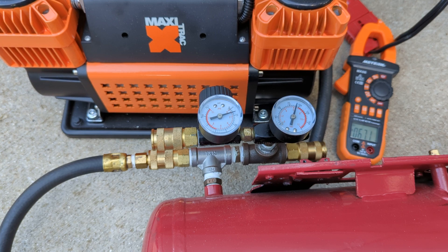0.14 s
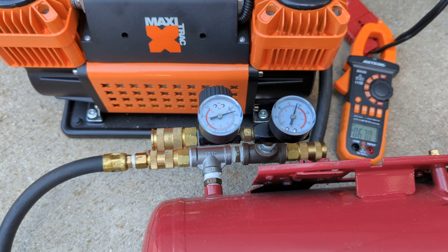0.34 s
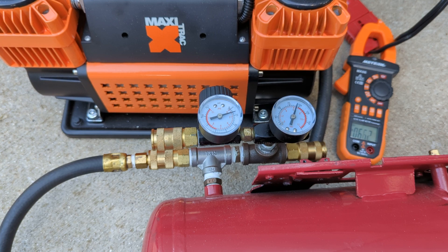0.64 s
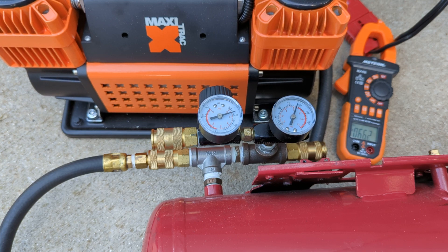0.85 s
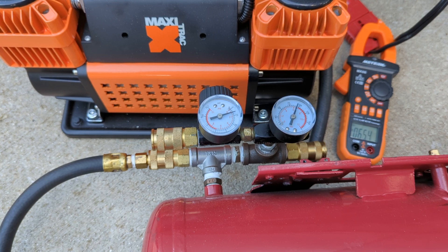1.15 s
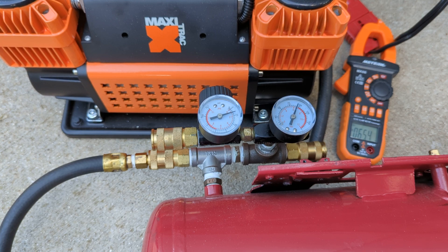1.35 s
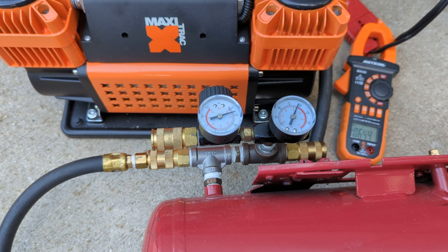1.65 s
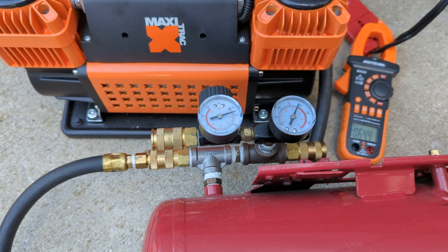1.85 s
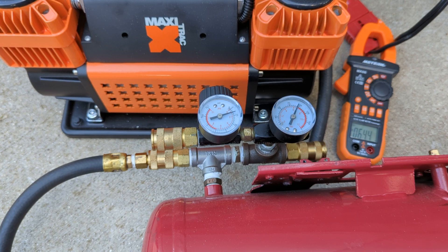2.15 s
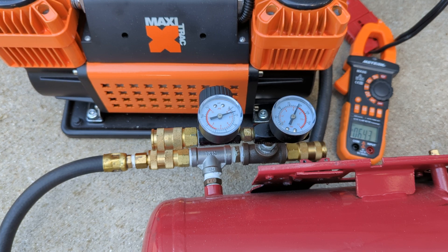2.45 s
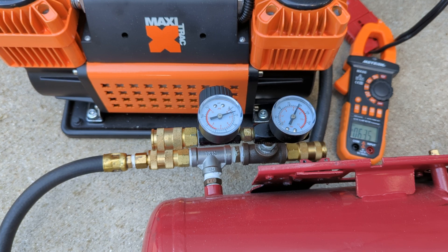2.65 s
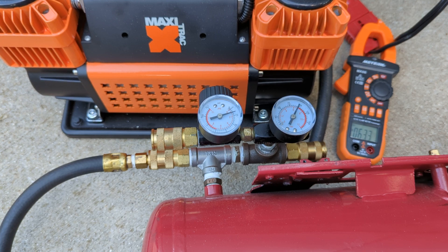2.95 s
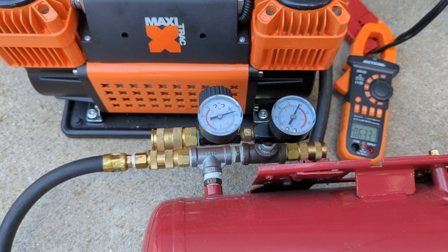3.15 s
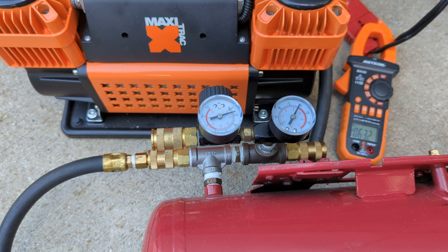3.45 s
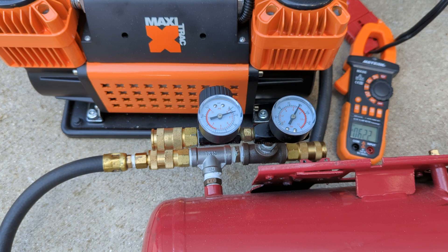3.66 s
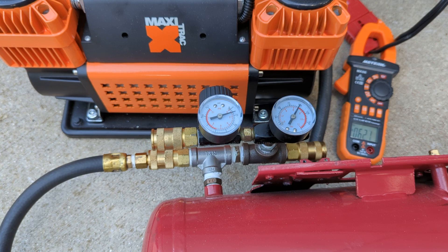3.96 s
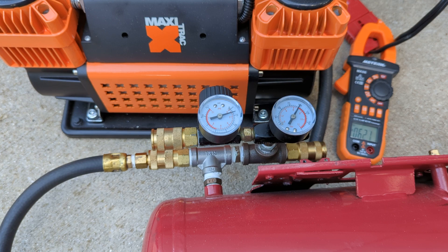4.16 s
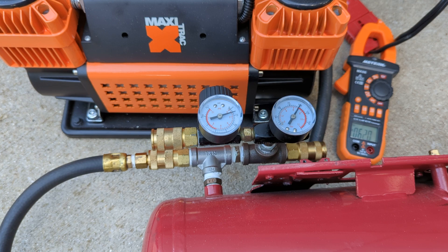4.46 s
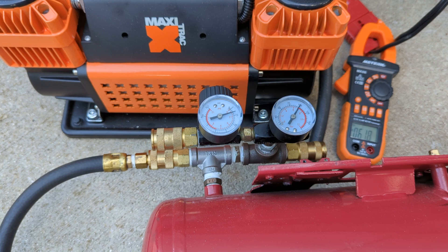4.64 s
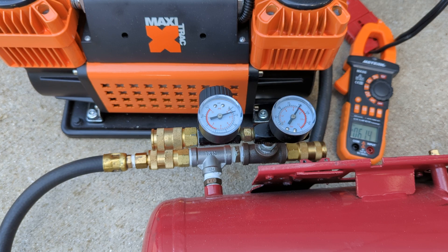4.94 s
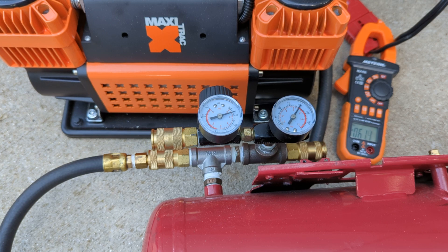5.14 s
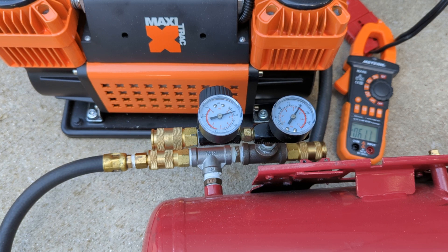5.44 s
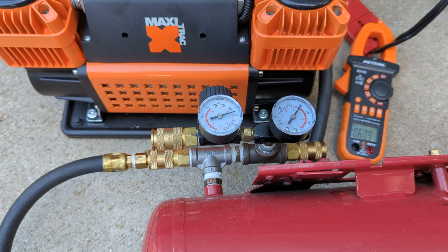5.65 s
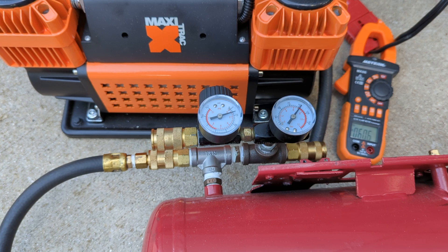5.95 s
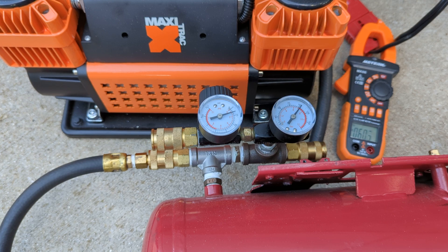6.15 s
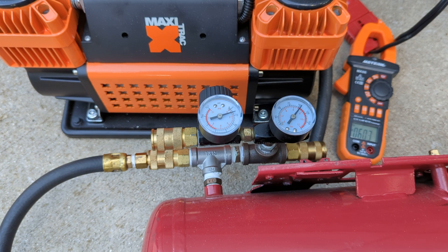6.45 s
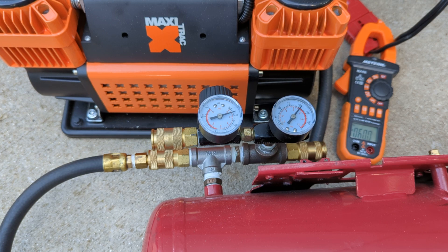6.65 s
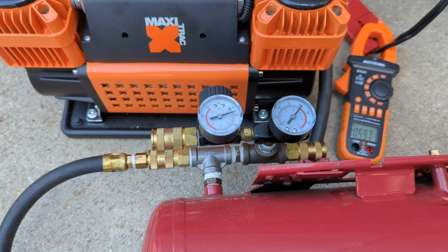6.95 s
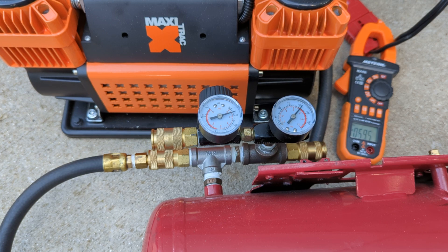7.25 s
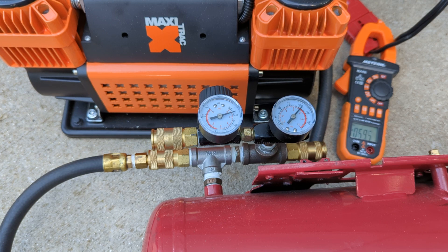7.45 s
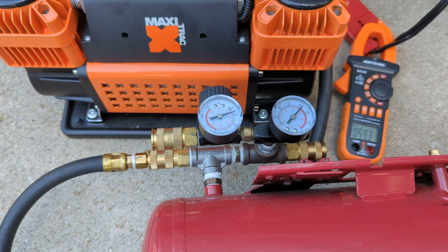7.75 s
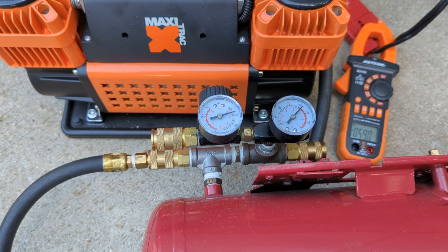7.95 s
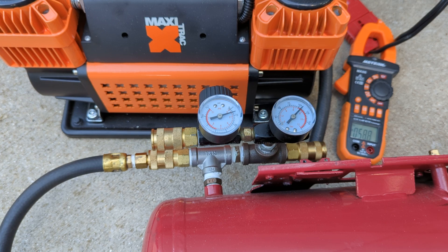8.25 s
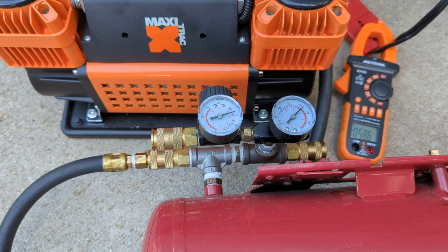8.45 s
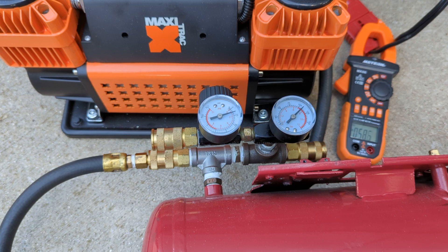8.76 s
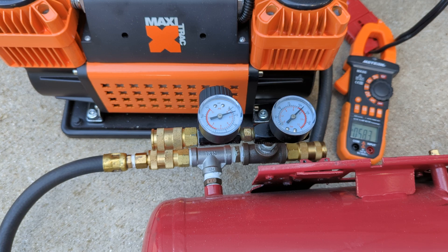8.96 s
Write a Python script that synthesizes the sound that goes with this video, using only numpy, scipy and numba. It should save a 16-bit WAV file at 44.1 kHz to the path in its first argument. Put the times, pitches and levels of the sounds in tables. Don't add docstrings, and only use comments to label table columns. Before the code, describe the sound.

Close, steady, raspy compressor chatter with hissing air rises very slightly in pitch over a low, uneven engine idle outdoors.

```python
import sys
import numpy as np
from scipy import signal
from scipy.fft import rfft, irfft
from scipy.io import wavfile
from scipy.ndimage import uniform_filter1d, minimum_filter1d
from numba import njit

SR = 44100
rng = np.random.default_rng(int(sys.argv[2]) if len(sys.argv) > 2 else 0)


def magnitude_from_level(level_db):
    exponent = np.asarray(level_db, float) / 20
    return 10 ** exponent


def unload_wav(signal):
    wavfile.write(
        sys.argv[1],
        SR,
        np.round(np.clip(np.atleast_2d(signal).T, -1, 1) * 32767).astype(np.int16),
    )


N = 401310
BLOCK = 256

# pitch_hz, level_db
EXHAUST_PIPE = [(48, -41), (96, -30), (144, -30), (192, -39), (240, -58), (310, -50)]
# place_among_eight, level_below_second_firing_db, level_above_it_db
CYLINDER_BANKS = [(0, 0, 0), (1, -27, -16), (2, -15, -8), (3, -6, -17), (4, -15, -9), (5, -3, -11),
                  (6, -14, -8), (7, -16, -14)]
# pitch_hz, level_db (per Hz)
AIR_HISS = [(50, -68), (100, -63), (200, -61.5), (300, -59.5), (500, -66), (900, -68), (1400, -67),
            (2000, -63.5), (2500, -66.5), (3300, -71), (4500, -79), (8000, -85.5), (11000, -81),
            (15500, -81)]
# pitch_hz, level_db
PORT_HISS = [(50, -18), (250, -7), (500, -9), (900, 7), (1500, 2.5), (4500, 1.5), (15500, 8.5)]
# pitch_hz, depth (0-1)
STROKE_PUFF = [(300, 0.16), (2000, 0), (5000, 0.2), (12000, 0.25)]
# pitch_hz, low_tank_db, full_tank_db (per tone)
REED_BUZZ = [(3080, -52, -58), (3520, -52, -57), (3930, -52, -43), (4400, -57, -58), (6070, -56, -53),
             (6180, -41, -68), (6370, -55.5, -56), (8000, -60, -68), (8600, -49, -61), (9300, -60, -57),
             (10800, -56, -84), (11300, -69, -64), (12000, -66, -68)]
# time_s, speed_hz (turns per second)
CRANK_SPEED = [(0, 72.497), (.9, 72.901), (1.2, 73.033), (1.6, 73.154), (2.7, 73.48), (3.3, 73.948),
               (4.4, 74.165), (5.6, 74.539), (7.2, 74.868), (9.1, 75.292)]
# time_s, fill (0-1)
TANK_FILL = [
    (0, 0.01),
    (2.5, 0.26),
    (4.4, 0.56),
    (6.4, .73),
    (9.1, 0.75),
]
# multiple (of crank speed), low_tank_db, full_tank_db, left_minus_right_db, left_lead_rad
SHARED_STROKE = [(2, -22, -27, 1, 0.1), (4, -24, -28, -1, 0.4), (6, -33, -39, 5, 1.7),
                 (8, -25, -36, 9, -0.1), (10, -17, -30, 4, 0.7), (12, -20, -26, 1, -0.1),
                 (14, -24, -28, -3, 1.3), (16, -33, -28, -2, 2.2), (18, -29, -29, 1, 0.8),
                 (20, -34, -32, -2, 2.7), (22, -24, -36, 6, 2.3), (24, -44, -29, 2, 0.1),
                 (26, -27, -23, 7, 2.3), (28, -29, -23, 6, 1.3), (30, -29, -28, 8, 0.8),
                 (32, -31, -37, 1, 0.4), (34, -46, -42, -3, 1.3), (36, -36, -38, 1, -0.3),
                 (38, -38, -46, 1, 2.1), (40, -41, -51, 3, 1.6), (42, -48, -57, 9, -1.6)]
# multiple (of crank speed), low_tank_db, full_tank_db, left_minus_right_db, left_lead_rad
PISTON_DIFFERENCE = [(1, -37, -36, -1, 0.0), (3, -39, -34, 4, 0.6), (5, -33, -35, 5, 0.4),
                     (7, -35, -36, 5, 1.7), (9, -26, -21, 4, 0.4), (11, -27, -24, -1, 0.8),
                     (13, -26, -23, -8, 0.5), (15, -24, -29, -6, 0.7), (17, -36, -34, 0, 1.5),
                     (19, -27, -34, 1, -2.5), (21, -38, -30, 11, -2.0), (23, -36, -38, 0, -0.3),
                     (25, -42, -38, 5, 1.2), (27, -30, -45, 6, 2.4), (29, -39, -38, 7, -0.9),
                     (31, -33, -37, -1, 0.2), (33, -46, -42, 1, 0.2), (35, -43, -38, 8, -0.7),
                     (37, -46, -33, -5, 2.2), (39, -42, -40, 3, 2.7), (41, -35, -49, 4, 0.1)]
SHARED_TIMING = [(2, 1.4, 1.4), (4, 2.1, 2.4), (8, .2, 1.5), (10, -1.1, -.2), (12, 0, 0), (14, -2.1, .5),
                 (20, 0, 3.8), (22, -2.3, 2.2), (26, -3.7, -.3), (32, -3.7, .5)]
DIFFERENCE_TIMING = [(5, 2.1, 3.1), (9, 2.8, 3.4), (11, 1.4, 2.7), (13, -.2, 2.1), (15, -.8, 1.7),
                     (17, -2.1, -2.4), (21, -2.9, -2.4), (31, -5.2, -1.3)]
# pitch_hz, width_hz, lift_db
HOUSING_RINGS = [
    (3017, 18, 8),
    (2675, 34, 4.5),
]


def curve(table, at, log=False):
    x, *columns = np.transpose(table)
    scale = np.log if log else np.asarray
    return [np.interp(scale(at), scale(x), column) for column in columns]


def walk(count, rate):
    blocks = N // BLOCK + 2
    hold = max(int(SR / BLOCK / rate), 1)
    held = np.repeat(rng.standard_normal((count, blocks // hold + 1)), hold, axis=1)
    smooth = uniform_filter1d(uniform_filter1d(held, hold), hold)
    return 1.3 * smooth[:, :blocks]


@njit
def stack(turns, first, left, right, block):
    out = np.zeros((2, len(turns)))
    for i in range(len(turns)):
        b, a = i // block, (i % block) / block
        step = np.exp(2j * np.pi * turns[i])
        z = np.exp(2j * np.pi * turns[i] * first)
        for k in range(left.shape[1]):
            out[0, i] += (z * (left[b, k] + a * (left[b + 1, k] - left[b, k]))).real
            out[1, i] += (z * (right[b, k] + a * (right[b + 1, k] - right[b, k]))).real
            z *= step
    return out


def tones(turns, first, left_db, right_db, phase, lead):
    left = np.sqrt(2) * magnitude_from_level(left_db) * np.exp(1j * (phase + lead / 2))
    right = np.sqrt(2) * magnitude_from_level(right_db) * np.exp(1j * (phase - lead / 2))
    return stack(turns, first, np.ascontiguousarray(left.T), np.ascontiguousarray(right.T), BLOCK)


def engine(fill, count=44):
    idle_hz = 6.007
    hunt_hz, hunt_period_s, hunt_at_s, hunt_lasts_s = .019, 1.37, 5.27, 2.2
    low_tank_db, full_tank_db = 2.9, -1.7
    since = np.arange(N) / SR - hunt_at_s
    hunting = np.exp(-(since / hunt_lasts_s) ** 2) * np.cos(2 * np.pi * since / hunt_period_s)
    cycles = np.cumsum(idle_hz + hunt_hz * hunting) / SR
    k = 8 + np.arange(count)[:, None]
    swell_db = low_tank_db + (full_tank_db - low_tank_db) * fill
    lines_db = curve(EXHAUST_PIPE, k * idle_hz)[0] + np.array(CYLINDER_BANKS)[k % 8, 1 + (k > 16)]
    db = lines_db + swell_db + .4 * walk(count, rate=2.5)
    anywhere = 2 * np.pi * rng.random((count, 1))
    phase = np.where(k % 8, anywhere, 3. - .062 * k) + .075 * walk(count, rate=6.8)
    return tones(cycles, 8., db, db - .4, phase, .29)


def air(turns):
    port_lag_s, floor_echo_s, floor_echo = .00016, .000746, .4
    hz = np.maximum(np.arange(N // 2 + 1) * SR / N, 1)
    hiss = magnitude_from_level(curve(AIR_HISS, hz, log=True)[0]) * np.sqrt(SR / 2)
    shared, left, right = rfft(rng.standard_normal((3, N))) * hiss
    apart = magnitude_from_level(curve(PORT_HISS, hz, log=True)[0])
    late = np.exp(-2j * np.pi * hz * port_lag_s)
    spectra = np.array([shared + apart * left, shared * late + apart * right])
    returned = floor_echo * np.interp(hz, [2500, 4500, 9000, 13000], [0, 1, 1, .2])
    spectra = spectra * (1 - returned * np.exp(-2j * np.pi * hz * floor_echo_s))

    centres = 40 * 2 ** (np.arange(28) / 3)
    count = len(centres)
    flicker_db = 1.2 * walk(count, rate=.51) + .57 * walk(count, rate=8.)
    flicker_db = flicker_db + .38 * walk(count=1, rate=9.4)
    out = np.zeros((2, N))
    for centre, db, at in zip(centres, flicker_db, rng.random(count)):
        share = np.cos(np.pi / 2 * np.clip(3 * np.log2(hz / centre), -1, 1)) ** 2
        each_stroke = np.cos(4 * np.pi * (turns - .05 - .05 * at))
        each_turn = 1.3 * np.cos(2 * np.pi * (turns - .56))
        throb = 1 + curve(STROKE_PUFF, centre, log=True)[0] * (each_stroke + each_turn)
        gain = magnitude_from_level(np.interp(np.arange(N) / BLOCK, np.arange(len(db)), db))
        out += irfft(spectra * share, N) * gain * throb
    return out


def rattle(turns, fill, count=120):
    slap_at = .52
    first = len(SHARED_STROKE + PISTON_DIFFERENCE) + 1
    k = first + np.arange(count)
    low_db, full_db = curve(REED_BUZZ, 72.9 * k, log=True)
    group_db = 2. * np.repeat(walk(count // 4, rate=1.5), 4, axis=0)
    db = low_db[:, None] + np.outer(full_db - low_db, fill) + group_db
    chance = rng.standard_normal((count, 4, 1))
    left_db = db + 2.2 * chance[:, 1] + 1.8 * walk(count, rate=.9) + 1.57
    right_db = db + 2.2 * chance[:, 2] + 1.8 * walk(count, rate=.9) - 1.8
    phase = .7 * chance[:, 0] + .5 * walk(count, rate=.5)
    phase = phase + .011 * k[:, None] * walk(count, rate=14.)
    lead = 1.8 * chance[:, 3] + .99 * walk(count, rate=.37)
    return tones(turns - slap_at, 1. * first, left_db, right_db, phase, lead)


def pistons(turns, fill, crank_hz):
    pump_db, leftward_db = .64, 2.5
    k, low_db, full_db, pan_db, lead = np.transpose(sorted(SHARED_STROKE + PISTON_DIFFERENCE))[:, :, None]
    count = len(k)
    low, full = np.where(k % 2, curve(DIFFERENCE_TIMING, k), curve(SHARED_TIMING, k))
    phase = low + (full - low) * fill
    phase = phase + .05 * np.maximum(k - 22, 0) * rng.standard_normal((count, 1))
    phase = phase + .008 * k * walk(count, rate=9.)
    drift_db = .018 * k * walk(count, rate=.7) + .4 * walk(count, rate=12.)
    db = pump_db + low_db + (full_db - low_db) * fill + drift_db
    ring_lift_db = 0
    for ring_hz, width_hz, lift_db in HOUSING_RINGS:
        ring_lift_db = ring_lift_db + lift_db * np.exp(-((k * crank_hz - ring_hz) / width_hz) ** 2)
    db = db + ring_lift_db
    side_db = .02 * k * walk(count, rate=.6) + (pan_db + leftward_db * (fill - .5)) / 2
    return tones(turns, 1., db + side_db, db - side_db, phase, lead)


def scene():
    crank_start = -.025
    turns = crank_start + np.cumsum(curve(CRANK_SPEED, np.arange(N) / SR)[0]) / SR
    blocks_s = np.arange(N // BLOCK + 2) * BLOCK / SR
    fill = curve(TANK_FILL, blocks_s)[0]
    crank_hz = curve(CRANK_SPEED, blocks_s)[0]
    return engine(fill) + air(turns) + rattle(turns, fill) + pistons(turns, fill, crank_hz)


def top_cut(x):
    return signal.sosfilt(signal.butter(12, 15690, fs=SR, output="sos"), x)


def record(dry):
    limit, release_s = .95, .006
    span = int(release_s * SR)
    duck = minimum_filter1d(np.minimum(limit / np.abs(dry).max(axis=0), 1), span)
    mix = dry * uniform_filter1d(duck, span)
    return top_cut(mix)


dry = scene()
out = record(dry)
unload_wav(out)
```